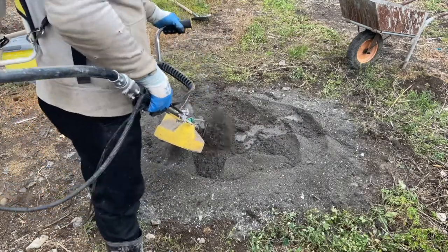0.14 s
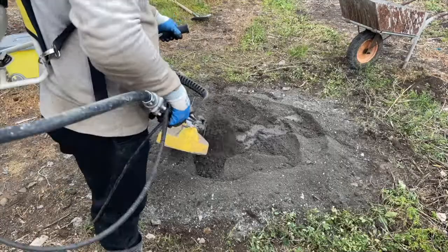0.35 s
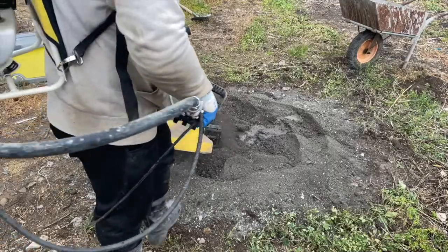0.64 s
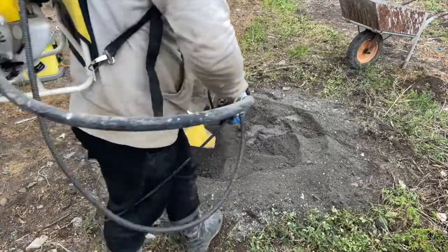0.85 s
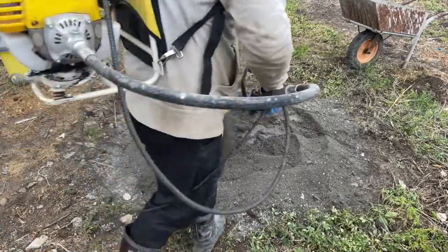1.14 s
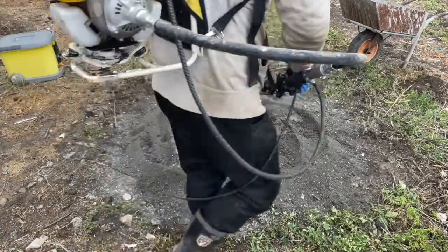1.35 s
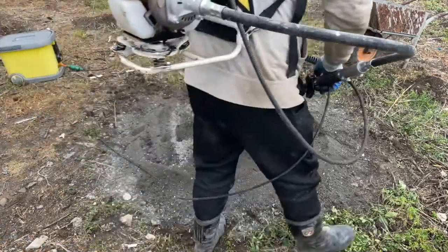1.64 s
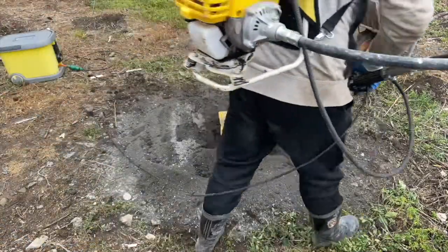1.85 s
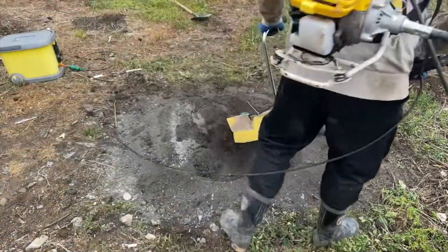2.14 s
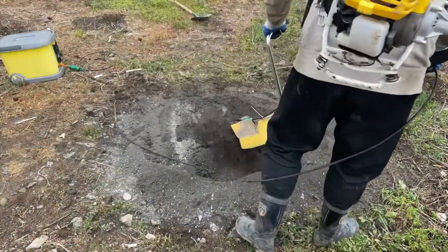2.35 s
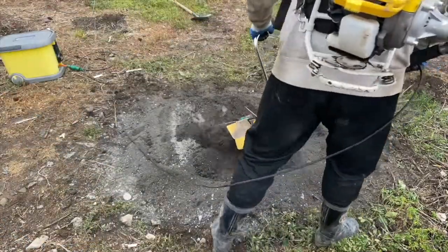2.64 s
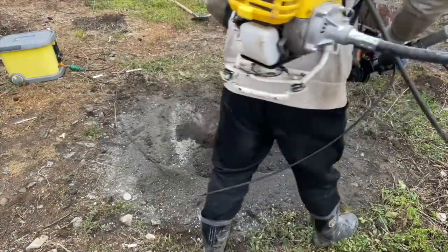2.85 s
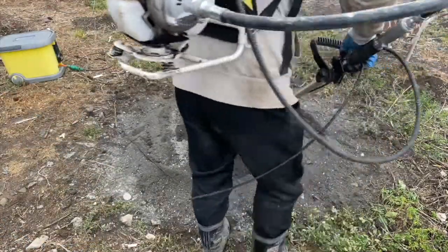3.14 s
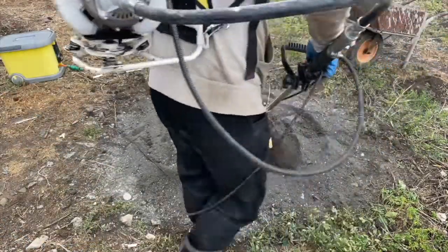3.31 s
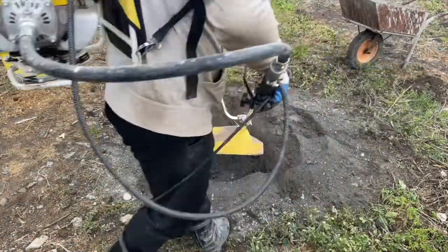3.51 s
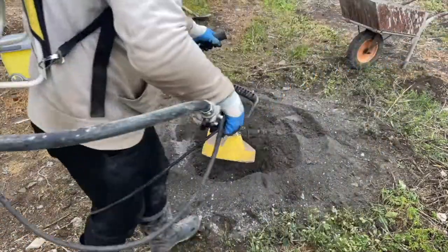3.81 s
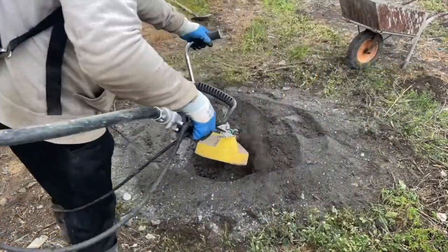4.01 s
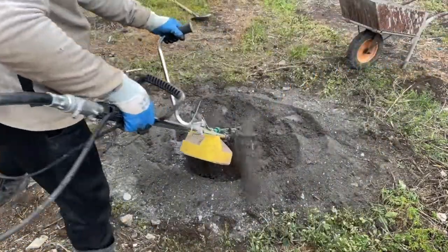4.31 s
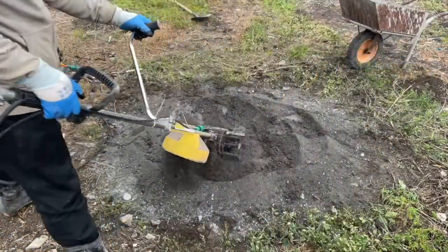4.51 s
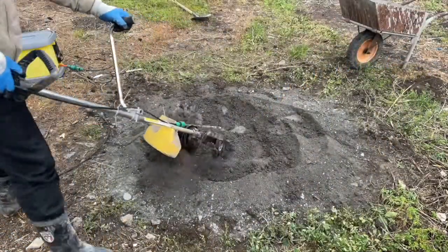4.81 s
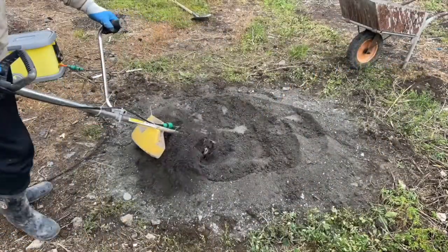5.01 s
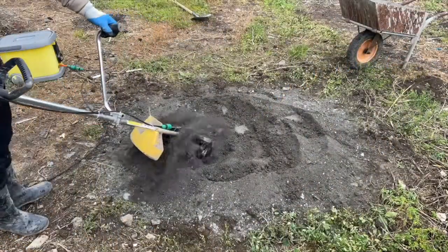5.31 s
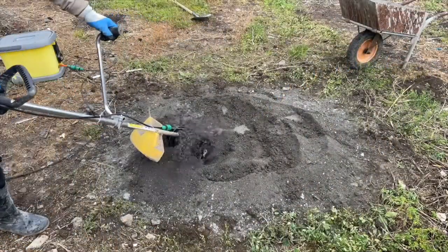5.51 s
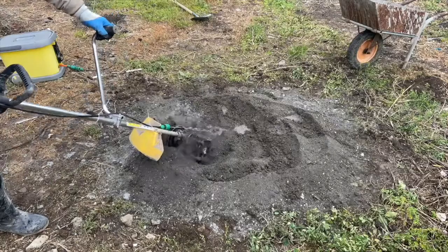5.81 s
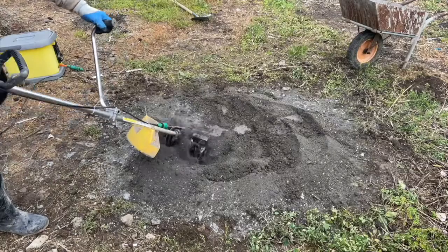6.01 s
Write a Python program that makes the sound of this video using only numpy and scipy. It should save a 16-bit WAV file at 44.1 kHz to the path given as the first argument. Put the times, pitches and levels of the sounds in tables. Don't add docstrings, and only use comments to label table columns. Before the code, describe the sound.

Close outdoor buzz of a small four-stroke motor, its casing ringing and whining as the operator turns, with gritty churning and sparse sharp clicks.

```python
import sys
import numpy as np
from scipy import signal
from scipy.fft import rfft, irfft
from scipy.io import wavfile
from scipy.ndimage import uniform_filter1d, map_coordinates

SR = 44100
rng = np.random.default_rng(int(sys.argv[2]) if len(sys.argv) > 2 else 0)


def elevation(decibels):
    levels = np.asarray(decibels, float)
    return 10 ** (levels / 20)


def materialize(psi):
    bounded = np.clip(np.atleast_2d(psi).T, -1, 1)
    quanta = np.round(bounded * 32767).astype(np.int16)
    wavfile.write(sys.argv[1], SR, quanta)


N = 271215
T = np.arange(N) / SR
HZ = np.arange(N // 2 + 1) * SR / N

# time in seconds, firing rate in Hz.
SPEED = [(0.0, 44.777), (0.53, 47.58), (0.83, 46.185), (1.46, 48.239), (1.77, 46.051), (1.89, 46.758),
         (2.22, 47.328), (2.6, 46.186), (3.0, 48.351), (3.18, 47.295), (3.84, 48.937), (4.41, 48.861),
         (4.69, 48.025), (4.88, 49.083), (5.03, 47.432), (5.56, 48.064), (5.72, 47.532), (6.15, 47.743)]
POSE = [(0, 1.18, 0.13, 0.82, 0.7), (.3, 1.12, 0.1, 0.87, 0.4), (.55, 1.09, 0.01, 0.89, 0.17),
        (1.001, 1.09, 0.13, 0.78, 0.34), (1.4, 0.92, 0.54, 0.31, 0.36), (1.8, 1.16, 0.84, 0.06, 0.2),
        (2.2, 1.04, 1, 0, 0.09), (2.5, 1.16, 0.91, 0.03, .05), (2.8, 1.45, 0.95, 0, 0.08),
        (3.101, 1.64, 0.83, 0.2, 0.22), (3.4, 2.22, 0.37, 0.5, 0), (3.85, 2.42, 0.02, 0.66, 0.49),
        (4.25, 1.8, 0.08, 0.5, 0.8), (4.6, 2.38, 0.46, .25, 1), (4.85, 2.7, 0.23, 0.2, 0.93),
        (5.05, 3, 0.13, 0.27, .95), (5.55, 2.55, 0.34, 0.06, 0.8), (6.15, 2.47, 0.12, 0.3, 0.8)]

# multiple of the firing rate, level in dB.
MUFFLER_SIDE = [(1, -6.5), (2, 6.5), (3, 6), (4, -13), (5, 7.5), (6, 4.5), (7, -3), (8, -18.5), (9, -14.5),
                (10, -11.5), (11, -2), (12, -22), (13, -24), (14, -15.5), (15, 5.5), (16, 4.5), (17, -11.5),
                (18, -7.5), (19, -2.5), (20, -5.5), (21, -3), (22, -14.5), (23, -10), (24, -13), (25, -2.5),
                (26, -31.5), (27, -14.5), (28, -19), (29, -44), (30, -34.5)]
MUFFLER_BACK = [(1, -9), (2, 3), (3, 2.5), (4, -14), (5, 1), (6, -4), (7, -5), (8, -5.5), (9, -7.5),
                (10, -10), (11, -19), (12, -7.5), (13, -9.5), (14, -8.5), (15, -22), (16, -12), (17, -18.5),
                (18, -11), (19, -9.5), (20, -19), (21, -15), (22, -7), (23, -13), (24, -9.5), (25, -23.5),
                (26, -8), (27, -13.5), (28, -9.5), (29, -30), (30, -15)]
MUFFLER_NEAR = [(1, -12.5), (2, -2), (3, -3.5), (4, -12), (5, 1.5), (6, -1.5), (7, -1.5), (8, -14.5),
                (9, -2), (10, -3.5), (11, -8.5), (12, -8), (13, -22.5), (14, -11), (15, -6.5), (16, -2.5),
                (17, -12), (18, -18.5), (19, -13.5), (20, -9.5), (21, -20.5), (22, -15), (23, -9),
                (24, -17), (25, -15.5), (26, -14), (27, -22), (28, -9), (29, -6), (30, -6.5)]
HIDDEN_DB = [6, 0.8, -5]
CHAMBERS = [(1.5, .2), (2.5, -.35), (3.5, .24), (4.5, -.05), (5.5, -.1), (6.5, .06), (7.5, .3), (8.5, .08),
            (9.5, .11), (10.5, .08), (11.5, -.02), (12.5, -.1), (13.5, -.05), (16.5, -.06)]
BEHIND_TURNS = {11: .33, 12: -.42, 13: .45, 15: -.27, 17: -.28, 18: -.22, 19: -.2}
# multiple, time in seconds, half length in seconds,
# change in dB.
REFLECTIONS = [(2, 4.5, .35, -3), (2, 5.1, .2, 3), (3, 1, .35, 2.5), (7, 5.8, .4, -4), (10, 1.3, .3, -1),
               (11, 1.2, 0.29, -7.5), (10, 4.55, .2, 4), (16, 0.091, 0.18, -6.5), (16, 3.9, 0.46, 0),
               (11, 4.1, .35, -4.5), (9, 3.7, .3, -0.5), (9, 5.75, .25, 3), (15, 5.9, .3, -4.5),
               (18, .1, .25, 10), (19, .1, 0.29, 8.5), (20, 4.75, .15, 6), (21, 4.2, .15, 4),
               (3, 4.15, .25, 6), (4, 2.3, 0.22, 6.5), (4, 4.7, 0.6, 5.5), (7, 0.093, 0.27, -8.5),
               (8, .1, .3, -5.5), (8, 5.3, .7, -7), (9, 6.1, .4, -4.5), (10, 3.95, 0.38, -10),
               (11, 2.35, 0.44, 9.5), (11, 3.4, .2, -6), (13, 1.1, 0.34, 5.5), (13, 3.5, 0.4, 3),
               (13, 4.7, .35, 3.5), (14, 0.42, 0.41, -3), (14, 3.9, .35, 7), (15, 0.4, .25, -6),
               (15, 2.35, .4, 6.5), (17, 0.45, 0.37, -8.5), (17, 4.55, 0.18, 7.5), (18, 1.4, .45, -12),
               (19, 1.3, .35, -6.5), (20, .4, 0.63, 2), (20, 2, .6, 8.5), (21, 1.9, .3, -6),
               (22, 1.1, .2, -10), (22, 4.0, .5, 6.5), (23, 0.66, 0.91, -3), (23, 3.6, 0.18, -2),
               (23, 5.2, .3, -6), (15, 5.1, .2, -6), (16, 5.1, .2, 1.5), (7, 4.75, .2, -5.5),
               (7, 5.5, .2, -3), (9, 1.0, 0.23, -1.5), (12, 2.9, .25, 3.5), (14, 2.9, .25, 3.5),
               (6, 4.1, .2, 2.5)]
MUFFLER_EDGES_HZ = [190, 380, 685, 860]
CASING_EDGES_HZ = [1400, 2200, 4000, 5300]

# share of the cycle, level in dB.
KNOCKS = [(.0, -0.5), (.058, 0.5), (.119, 1), (0.191, -0.5), (0.252, 1), (.368, -2.5), (.5, 3), (.62, -2.5),
          (0.759, 4), (0.881, 1.5)]
# frequency in Hz, width in Hz, level in dB.
METAL = [(2103, 20, -6), (2225, 31, -12), (2680, 31, -15), (3374, 50, -12), (3816, 36, -8),
         (3910, 130, -10), (4245, 20, -7), (4704, 50, -11), (5010, 130, -8), (5626, 77, -2.5),
         (5930, 110, -1.5), (6450, 110, 6)]
# frequency in Hz, width in Hz.
PLATE_MODES = [(1450, 100), (2650, 170), (3052, 24), (3500, 24), (3740, 40), (5820, 44), (6125, 45),
               (2525, 30), (3330, 35)]
FIN_MODES = [(4260, 60), (4690, 35), (4880, 70), (5150, 35), (5930, 34), (6690, 70), (4035, 35), (5050, 60),
             (3850, 60), (2030, 70)]

# level at 1 m in dB, then changes in dB from the back, close by and
MUFFLER_PARTS = [
    (-34, 1, 3, -1),
    (-33.5, -0.5, -0.8, 0.5),
    (-35, -5.5, -5, 2),
    (-38.5, -3.5, -5, -2.5),
    (-36, -3.5, 0.2, 0),
]
CASING_PARTS = [
    (-36.5, -2, -0.4, -0.1),
    (-37.5, 1, -2, -2),
    (-36, -1, -2, -7.5),
    (-38.5, -5, -1, -17),
]
PLATE_PARTS = [(-42, 1.7, 4.5, -10), (-50, 1.9, -7, 9), (-47, 3, -6, 3.5), (-50.5, 11.6, -1, -4.5),
               (-56.5, 10, -14, -9), (-51.5, 7.8, -5.5, -14), (-43.5, 3.8, 0.5, -11), (-51.5, 2.4, -1, -6),
               (-50, 1.9, -2, -4.5)]
FIN_PARTS = [(-55.5, 1.4, -1.6, -6.0)] * len(FIN_MODES)
WHINE_PARTS = [
    (-43.5, 0.59, 0.72, 0.5),
    (-48.5, 5, -.1, -3),
]
HALF_HUM_PARTS = [
    (-54, -.1, -.1, -.1),
    (-59.5, -.1, -.1, -.1),
]
# time in seconds, half length in seconds, change in dB.
MUFFLER_BEAMS = [
    [(4.15, 0.19, -0.94)],
    [(2.95, .2, 1.5), (2.5, 0.35, -2.5), (4.29, 0.28, -4.5)],
    [(.2, 0.45, 1.5), (4.0, 0.32, -0.17)],
    [(.63, 0.2, 5.5), (4.5, .15, -3.5), (4.85, 0.1, -7)],
    [(.3, 0.36, -1.5), (1.25, 0.37, -2), (3.1, 0.23, -2.5), (4.6, 0.11, 2), (4.83, 0.073, 5),
     (5.25, 0.2, -2)],
]
CASING_BEAMS = [
    [(.1, 0.18, -1), (2.6, 0.37, -2), (4.4, 0.23, -1.5)],
    [(2.3, .5, -1.4), (4.4, .2, -1.3)],
    [(1.1, .15, 5.5), (1.6, 0.24, 4), (2.4, .35, -3), (3.1, 0.28, 2), (4.4, .15, 2)],
    [(1.1, 0.081, 7.3), (2.7, 0.18, 1.3)],
]
PLATE_BEAMS = [
    [(.3, 0.055, -5), (.95, 0.25, 7.5), (2.45, 0.35, 9)],
    [(1.15, 0.063, 0), (2.42, 0.39, 20), (2.7, 0.22, 0), (6.05, .12, 1)],
    [(.72, 0.13, 12.5), (1.42, 0.09, 12.5), (2.3, .33, 14), (2.77, 0.047, 11.5)],
    [(.01, 0.078, 13.5), (1.15, .15, -2), (1.65, 0.14, 11), (1.9, .2, 7.5), (2.1, 0.14, 4.5),
     (2.8, 0.29, 5.5)],
    [(1.5, 0.13, 2), (2.0, 0.29, 18), (2.6, 0.15, 15)],
    [(2.08, .15, 12.5), (2.8, .13, 9)],
    [(1.45, 0.2, 8.5), (2.6, 0.27, 5.5), (3.2, 0.11, 7)],
    [(2.05, .1, 7), (2.33, 0.25, 15), (2.75, 0.2, 11.5)],
    [(1.45, 0.22, 13.5), (2.1, 0.14, 8), (2.95, 0.23, 9.5)],
]
FIN_BEAMS = [
    [(1.55, .35, 7.2), (3.2, .1, 8)],
    [(1.6, .3, 15), (2.9, 0.19, 9), (5.7, 0.51, 17)],
    [(2.9, .2, 6.4), (3.0, 0.11, 18), (.1, .15, 8)],
    [(2.1, .25, 9.2), (2.55, 0.17, 7.8), (5.6, .1, 8)],
    [(1.4, .15, 12)],
    [(2.2, 0.16, 10), (2.8, 0.16, 8)],
    [(2.08, .1, 10), (2.55, .12, 11)],
    [(5.95, .25, 12)],
    [(5.5, .12, 12), (2.5, .1, 8)],
    [(.06, .08, 12), (1.4, .15, 8)],
]
WHINE_BEAMS = [
    [(.55, 0.19, 7), (2.2, 0.7, 8.8), (4.2, 0.2, 5.7), (4.43, .08, 5.7), (5.02, 0.072, 6.9)],
    [(.01, 0.074, 10), (.95, 0.24, 7.8), (1.7, 0.24, 6.5), (2.03, 0.17, 11), (2.4, 0.1, 5.5),
     (2.68, .25, 10.5), (4.28, 0.17, 8)],
]
HALF_HUM_BEAMS = [
    [(1.2, 0.27, 13), (1.75, 0.29, 15), (4.25, 0.23, 5.4)],
    [(.2, 0.42, 19), (.75, 0.28, 10), (1.7, 0.31, 5)],
]

# frequency in Hz, level in dB per Hz.
GRIT_COLOUR = [(18, -39), (30, -10), (96, 3.5), (191, 7), (246, -41.5), (380, -29.5), (436, -29.5),
               (754, -4), (3820, -13), (6620, -11.5), (7090, -25), (9220, -64.5), (15600, -120)]
# time in seconds, peak in dB.
GUSTS = [(.08, -55), (.2, -50), (.46, -41.5), (.99, -42.5), (1.271, -50), (1.54, -43), (1.93, -45),
         (2.19, -47), (2.4, -51), (3.58, -53), (4.54, -54), (4.68, -59), (5.22, -52), (5.45, -49),
         (5.7, -59), (5.91, -59), (6.1, -51)]
# start in seconds, peak in dB, pitch in Hz.
STONES = [
    (1.2032, -28, 3378),
    (1.5996, -21.5, 3500),
    (2.1958, -17.5, 2950),
    (2.304, -23.5, 3080),
    (3.068, -24.5, 3530),
    (4.9305, -41, 2720),
]


def level(x, db):
    return x * elevation(db) / np.sqrt(np.mean(x ** 2))


def curves(table, t=T):
    s, *columns = np.transpose(table)
    return [np.interp(t, s, column) for column in columns]


def bump(t, at, half):
    return np.exp(-((t - at) / half) ** 2)


def shape(x, *gains):
    spectrum = rfft(x)
    out = [irfft(spectrum * gain, N) for gain in gains]
    return out if len(out) > 1 else out[0]


def split(x, edges_hz, order):
    lows = [1 / (1 + (HZ / f) ** (2 * order)) for f in edges_hz]
    return shape(x, *[b - a for a, b in zip([0] + lows, lows + [1])])


def radiate(bands, bands_db):
    return sum(level(band, 0) * elevation(db) for band, db in zip(bands, bands_db))


def resonance(hz, width):
    return 1j * HZ * width / (hz ** 2 - HZ ** 2 + 1j * HZ * width)


def walk(rate):
    k = int(SR / rate)
    held = np.repeat(rng.standard_normal(N // k + 1), k)
    return 1.92 * uniform_filter1d(uniform_filter1d(held, k), k)[:N]


def clicks(s, size):
    at = np.clip(s * SR, 0, N - 2)
    i = at.astype(int)
    return np.bincount(i, size * (1 - at + i), N) + np.bincount(i + 1, size * (at - i), N)


def heard(parts, beams, step=64):
    t = np.arange(0, N + step, step) / SR
    metres, *view = curves(POSE, t)
    turn, close, hidden = np.clip(view, 0, 1)
    out = []
    for (db, back_db, close_db, hidden_db), rows in zip(parts, beams):
        beam_db = sum(rise_db * bump(t, at, half) for at, half, rise_db in rows)
        view_db = back_db * turn + close_db * close + hidden_db * hidden
        out.append(np.interp(T, t, db - 20 * np.log10(metres) + view_db + beam_db))
    return out


def exhaust(cycle, bands_db):
    side, back, near = (np.array(m)[:, 1] for m in (MUFFLER_SIDE, MUFFLER_BACK, MUFFLER_NEAR))
    turn, close, hidden = np.clip(curves(POSE)[1:], 0, 1)
    behind = np.clip(3 * turn - 1.4, 0, 1)
    aside = np.clip((T - 4.8) / .3, 0, 1)
    uneven = cycle + .001 * walk(48) + .012 * bump(T, 4.6, .35)
    tone = 0
    for k in range(1, len(side) + 1):
        i = k - 1
        db = side[i] + turn * (back - side)[i] + close * (near - side)[i] + .8 * walk(6)
        db = db + hidden * (HIDDEN_DB[i] if k < 4 else 0)
        db = db + sum(rise_db * bump(T, at, half) for m, at, half, rise_db in REFLECTIONS if round(m) == k)
        scatter = min(k / 16, 1) * (.3 + .25 * turn + .1 * close) * walk(.8)
        turns = sum(step for above, step in CHAMBERS if k > above) - .06
        turns = turns + turn * (.09 * (k != 5) - .06 * max(k - 9, 0))
        turns = turns + behind * BEHIND_TURNS.get(k, 0)
        turns = turns - .2 * (1 - hidden) * close * (k > 12)
        turns = turns - close * (.12 * (k in (9, 10)) + .25 * (k == 11))
        turns = turns - aside * .013 * k * (k < 10)
        tone = tone + elevation(db) * np.cos(2 * np.pi * (k * uneven + turns) + scatter)
    tone = level(tone * elevation(.5 * walk(48)), 0)
    puff = .5 + np.exp(-(cycle % 1) / .64)
    gas = shape(rng.standard_normal(N) * puff, HZ / (HZ + 500) / (1 + (HZ / 1450) ** 12))
    blow = tone + level(gas, -13.5)
    return radiate(split(blow, MUFFLER_EDGES_HZ, order=6), bands_db)


def clatter(cycle, keep_s=.18, knock=.074, tick=.025):
    steps = 1024
    share = np.arange(steps) / steps
    envelope = sum(elevation(db) * np.exp(-((share - at) % 1) / knock) for at, db in KNOCKS)
    envelope = envelope + elevation(2) * np.exp(-share / tick)
    patterns = rng.standard_normal((64, steps)) * envelope
    age = T / keep_s
    place = (cycle + .0012 * walk(60)) % 1 * (steps - 1)
    knocks = map_coordinates(patterns, [age, place], order=1) / np.hypot(age % 1, 1 - age % 1)
    swell = 2.5 + np.exp(-(cycle % 1) / .23)
    hiss = rng.standard_normal(N) * swell
    return level(knocks * elevation(.54 * walk(150)), 0) + level(hiss * elevation(.81 * walk(7.4)), -.5)


def casing(drive, bands_db, ring_db=-9.5):
    modes = shape(drive, *[resonance(hz, width) for hz, width, db in METAL])
    rings = sum(elevation(row[2] + 1.2 * walk(2.2)) * mode for row, mode in zip(METAL, modes))
    sound = level(drive, 0) + level(rings, 0) * elevation(ring_db)
    without_lowest = split(sound, CASING_EDGES_HZ, order=4)[1:]
    return radiate(without_lowest, bands_db)


def plates(drive):
    rings = shape(drive, *[resonance(hz, width) for hz, width in PLATE_MODES + FIN_MODES])
    levels_db = heard(PLATE_PARTS + FIN_PARTS, PLATE_BEAMS + FIN_BEAMS)
    out = 0
    for ring, db in zip(rings, levels_db):
        loudness = np.sqrt(uniform_filter1d(ring ** 2, size=3000))
        out = out + ring / loudness * elevation(db - 4)
    return out


def whine(cycle, fan_db, gear_db):
    surge = .06 * np.sin(2 * np.pi * cycle)

    def tone(db, per_firing):
        phase = per_firing * cycle + surge + .1 * walk(30)
        return elevation(db + .9 * walk(25)) * np.cos(2 * np.pi * phase)

    return (tone(fan_db, 36) + tone(gear_db, 49)) * (1 + .35 * np.cos(2 * np.pi * cycle))


def half_hum(cycle, low_db, high_db):
    def hum(db, multiple):
        return elevation(db + 2 * walk(16)) * np.cos(2 * np.pi * (multiple * cycle + .3 * walk(19)))

    return hum(low_db, 2.5) + hum(high_db, 3.5)


def grit(grains_per_s=900, spread_db=-7, grit_db=-50):
    count = int(grains_per_s * N / SR)
    size = elevation(spread_db * rng.exponential(size=count)) * rng.choice([-1, 1], count)
    grains = clicks(rng.random(count) * N / SR, size)
    rush = level(grains, 0) + level(rng.standard_normal(N), 15)
    hz, db = np.transpose(GRIT_COLOUR)
    colour = elevation(np.interp(np.log(HZ + 1), np.log(hz), db))
    return level(shape(rush * elevation(walk(5.9)), colour), grit_db)


def breeze(gust_s=.11, calm_db=-56.5):
    rumble = shape(rng.standard_normal(N), resonance(75, 110) * resonance(90, 170) * resonance(110, 210))
    gusts = sum(elevation(db) * bump(T, s, gust_s) for s, db in GUSTS)
    return level(rumble, 0) * (elevation(calm_db) + gusts)


def stones(t60=.026):
    out, t = np.zeros(N), np.arange(1200) / SR
    for s, db, hz in STONES:
        tick = .71 * np.sin(2 * np.pi * hz * t) + 1.1 * rng.standard_normal(len(t))
        i = int(s * SR)
        out[i:i + len(t)] += elevation(db) * tick * np.exp(-np.log(1000) * t / t60)
    return out


def scene():
    cycle = np.cumsum(curves(SPEED)[0]) / SR + 1.14
    drive = clatter(cycle + .03986)
    engine = exhaust(cycle, heard(MUFFLER_PARTS, MUFFLER_BEAMS))
    engine = engine + casing(drive, heard(CASING_PARTS, CASING_BEAMS)) + plates(drive)
    engine = engine + whine(cycle, *heard(WHINE_PARTS, WHINE_BEAMS))
    engine = engine + half_hum(cycle, *heard(HALF_HUM_PARTS, HALF_HUM_BEAMS))
    return (engine + grit() + breeze() + stones())[None]


def band_limit(x):
    return signal.sosfilt(signal.butter(12, 7240, fs=SR, output="sos"), x)


def record(dry):
    squeeze, top_hz = 2.5, 6970
    soft = np.tanh(squeeze * dry) / squeeze
    steep = signal.cheby1(16, .5, top_hz, fs=SR, output="sos")
    mix = signal.sosfilt(steep, soft)
    return band_limit(mix)


dry = scene()
out = record(dry)
materialize(out)
```